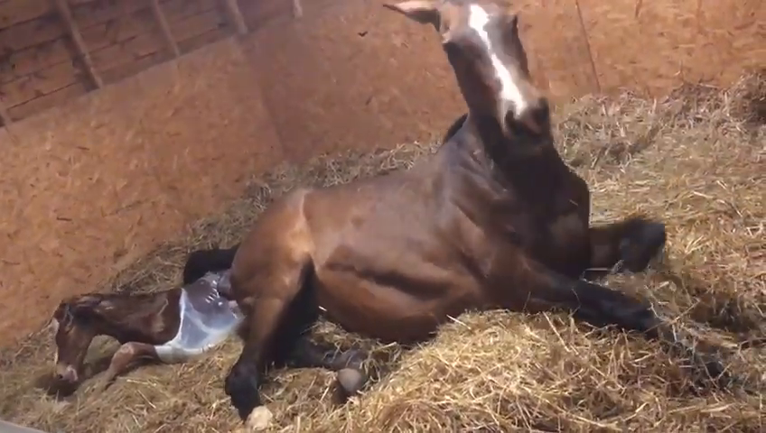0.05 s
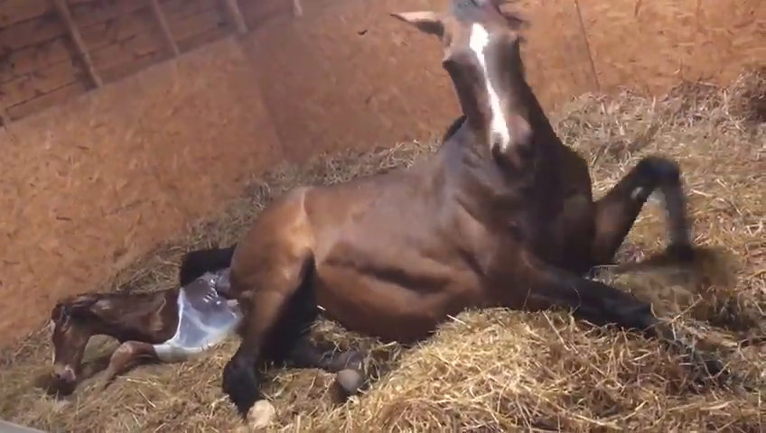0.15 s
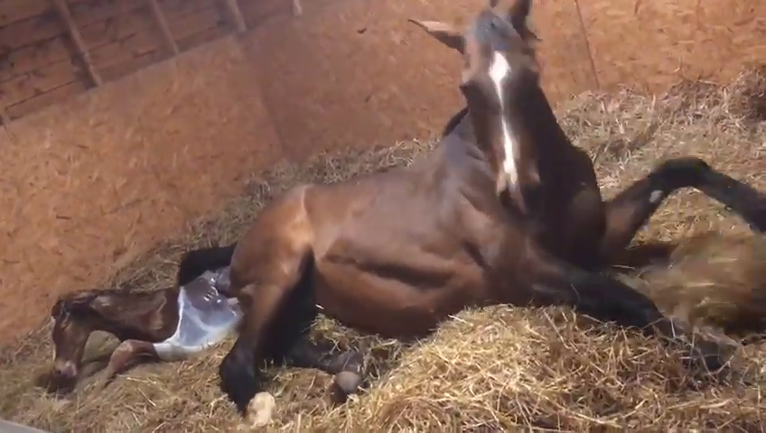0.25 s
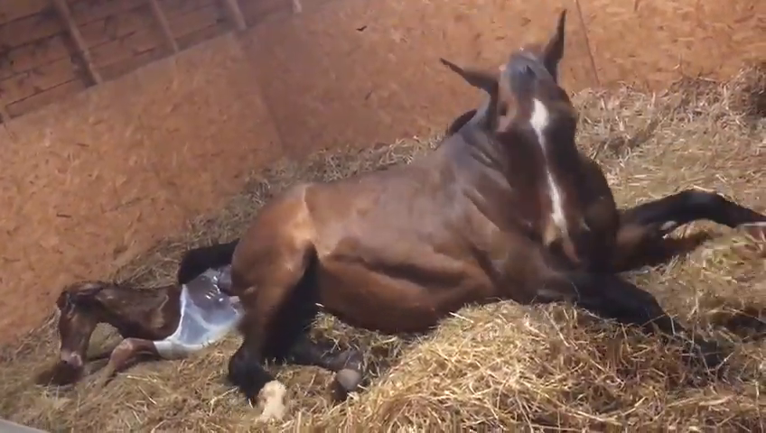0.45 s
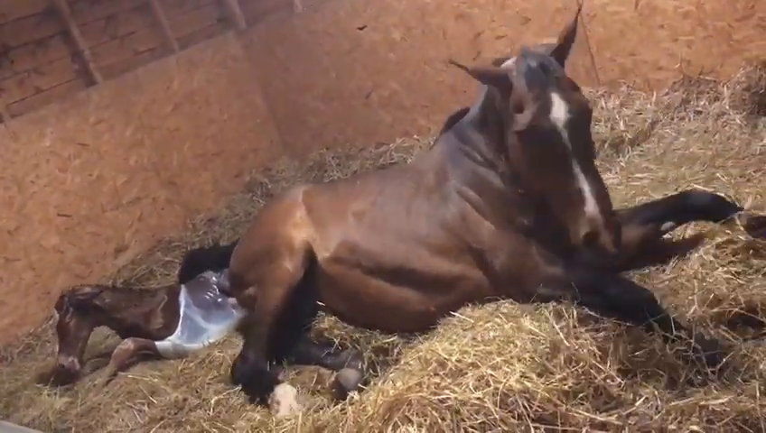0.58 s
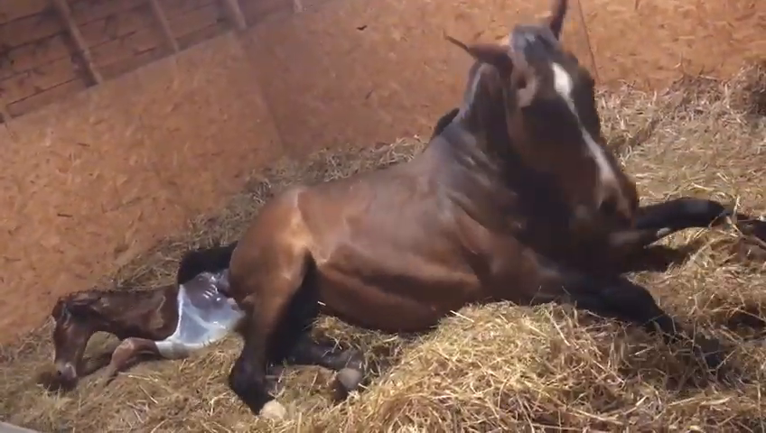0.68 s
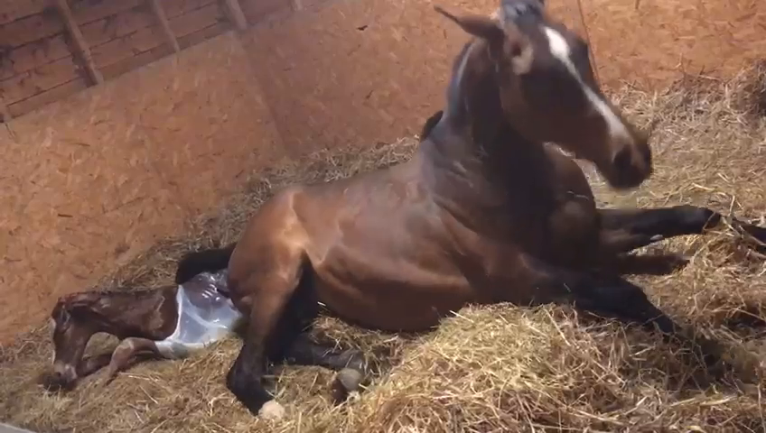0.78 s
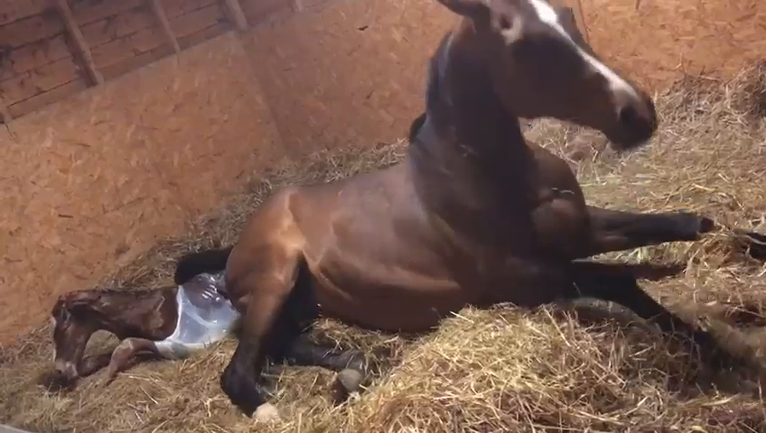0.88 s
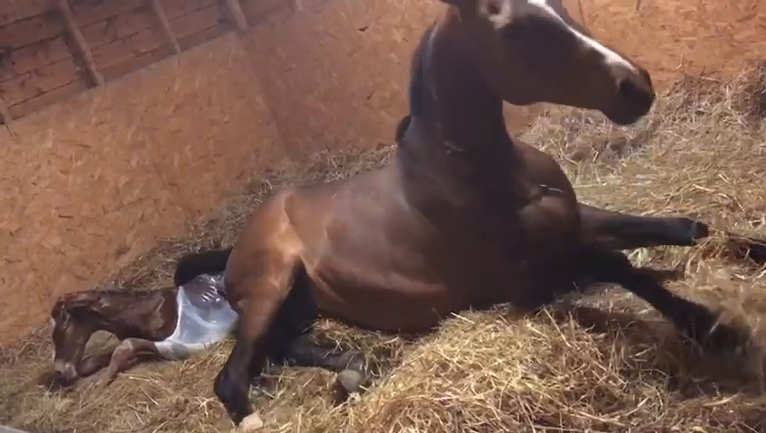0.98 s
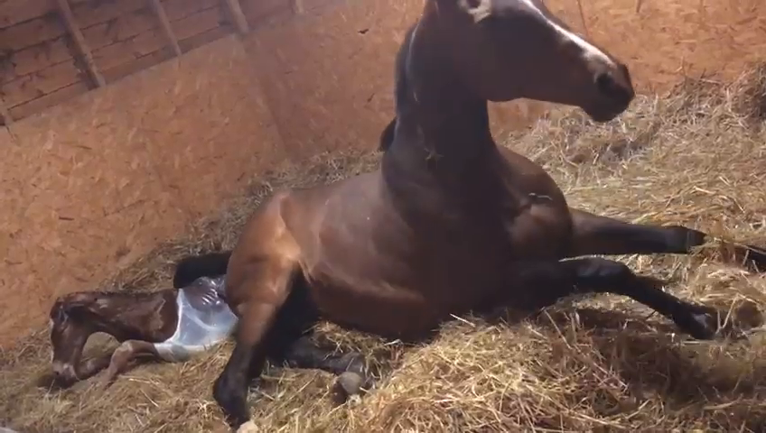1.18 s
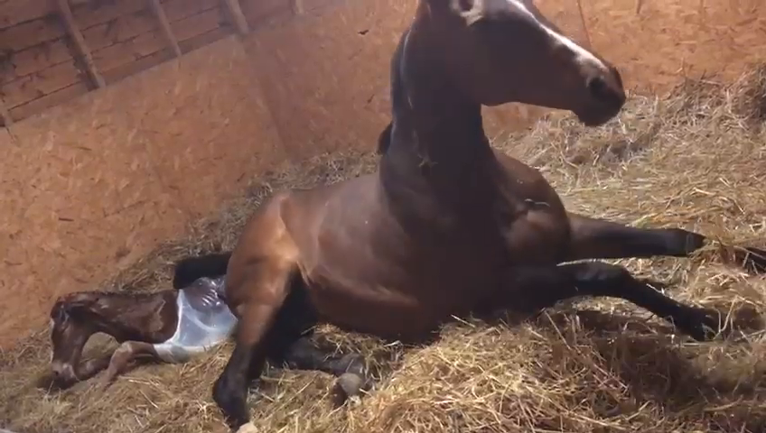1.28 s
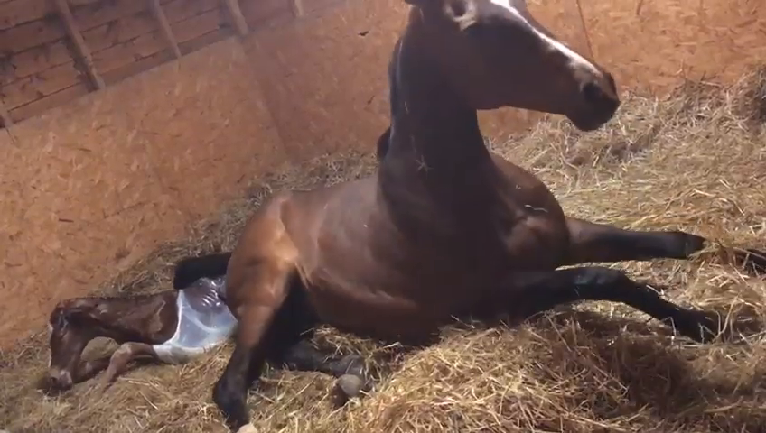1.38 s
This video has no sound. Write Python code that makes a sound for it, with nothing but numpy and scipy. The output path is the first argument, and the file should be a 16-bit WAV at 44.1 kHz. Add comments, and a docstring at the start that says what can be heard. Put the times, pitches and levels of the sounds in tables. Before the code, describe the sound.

Dry straw rustles in two swells under a horse shifting on the floor of a wooden stall. Between them a leg drops with a low thump and the hoof scuffs the boards, while the moving body rumbles faintly.

```python
"""Straw rustles, a dull thump booms, then the straw rustles again.
A horse lying in a wooden stall swings a foreleg through the straw, drops it, then slides its legs out.
Countless stalks scrape and snap under each move; the landing leg excites low modes of floor and stall,
and the hoof scuffs the boards. The shifting body rumbles; a faint low hum swells near the end."""
import sys
import numpy as np
from scipy import signal
from scipy.fft import rfft, irfft
from scipy.io import wavfile
from scipy.ndimage import uniform_filter1d

SR = 44100
rng = np.random.default_rng(int(sys.argv[2]) if len(sys.argv) > 2 else 0)


def file_out(sig):
    """Save sig as 16-bit WAV at sys.argv[1]."""
    # one column per channel
    cols = np.atleast_2d(sig).T
    # limit, then scale
    lim = np.clip(cols, -1, 1)
    pcm = np.round(lim * 32767).astype(np.int16)
    wavfile.write(sys.argv[1], SR, pcm)


N = 63945
T = np.arange(N) / SR
FREQ_HZ = np.fft.rfftfreq(N, 1 / SR)
STRAW_WET_DB = -9.5
# push of the legs through the straw: t/s, level/dB
LEG_PUSH = [(0, -82), (.025, -63.5), (.06, -55), (.15, -54), (.2, -50.5), (.26, -40.5), (.3, -40.5),
            (.36, -43.5), (.408, -40.5), (.45, -50), (.6, -50.5), (.68, -60.5), (.76, -63), (.83, -60),
            (.95, -48), (1.03, -45.5), (1.11, -41), (1.17, -45), (1.245, -56), (1.31, -65), (1.385, -74),
            (1.45, -75)]


def straw(crack_db=-5, scrape_db=-2.5, clump_db=-0.04, swept_until_s=0.42, pressed_from_s=0.47):
    """Stalks crack and scrape on each other, as loud as the legs push."""
    # rustle spectrum: f/Hz, level/dB
    spectrum = [(70, -40), (170, -6), (300, -12), (520, -10.5), (660, -8.5), (790, -12), (1250, -12.5),
                (1550, -7.5), (2100, -5.5), (2780, -9), (3200, -3.5), (4800, -5), (6300, -1.4), (7700, -4),
                (9100, -0.3), (10300, -4.5), (11800, -8)]
    # extra colour of a quick sweep: f/Hz, level/dB
    quick_tilt = [(300, 1.5), (1500, 1.5), (5000, 3.5), (8000, 2.5), (11500, 3.5)]
    rustle = bunches(amp(crack_db) * cracks() + amp(scrape_db) * noise())
    rustle *= amp(clump_db * drift(samples=300))
    slow = colour(rustle, spectrum)
    quick = colour(slow, quick_tilt)
    pressed = curve([(swept_until_s, 0), (pressed_from_s, 1)])
    rustle = (1 - pressed) * quick + pressed * slow
    return unit(rustle + amp(STRAW_WET_DB) * stall_reverb(rustle)) * amp(curve(LEG_PUSH))


def cracks(kinds=40, rate_per_s=3100, spread_db=3, decay_s=0.00055):
    """Stalks crack at random, each kind with its own brief splintering."""
    strength = amp(spread_db * np.minimum(rng.exponential(1, N), 4))
    impulses = strength * (rng.random(N) < rate_per_s / SR)
    kind = rng.integers(0, kinds, N)
    t = T[T < .006]
    splinters = rng.standard_normal((kinds, len(t))) * np.exp(-t / decay_s)
    return unit(sum(signal.oaconvolve(impulses * (kind == k), splinters[k])[:N] for k in range(kinds)))


def bunches(x, depth_db=1):
    """Each bunch of stalks favours its own pitch for a few milliseconds."""
    frames = signal.stft(x, nperseg=256)[2]
    patches = uniform_filter1d(rng.standard_normal(frames.shape), size=6, axis=0)
    patches = uniform_filter1d(patches, size=3, axis=1)
    return unit(signal.istft(frames * amp(depth_db * unit(patches)))[1][:N])


def snaps(tick_hz=6000, tick_s=0.000041, splinter_s=0.0068, splinter_db=-17, highpass_hz=1500):
    """Single stalks break: a sharp tick, then short splintering."""
    # stalk breaks: t/s, level/dB
    breaks = [(0.024, -49), (.0363, -47), (0.376, -32), (0.4056, -33), (0.412, -28), (0.7973, -39),
              (1.2932, -39)]
    out = np.zeros(N)
    for start_s, db in breaks:
        t = np.maximum(T - start_s, 0)
        tick = np.exp(-t / tick_s) * np.cos(2 * np.pi * tick_hz * t)
        splinter = amp(splinter_db) * np.exp(-t / splinter_s) * noise()
        out += (T >= start_s) * amp(db) * (tick + splinter)
    out = signal.sosfilt(signal.butter(2, highpass_hz, "high", fs=SR, output="sos"), out)
    return out + amp(STRAW_WET_DB) * stall_reverb(out)


def thumps(rise_cycles=1.1):
    """Cushioned blows swell into the low modes of floor and stall."""
    # legs landing and settling: t/s, level/dB, roll-off/(dB/octave)
    blows = [(0.142, -55, 5), (.389, -29, 1), (0.485, -42, 1.5), (.695, -49.5, 4.5), (.802, -49, 8.5),
             (1.074, -64.5, -2.5)]
    # floor and stall modes: f/Hz, gain/dB, t60/s, delay/s
    modes = [(44, -11, 0.32, 0.0064), (61.46, -1.5, 0.4, 0.0062), (75.34, -7, 0.7, 0.00796),
             (108.3, 4.5, 0.17, 0.028), (159.7, -16.5, 0.34, 0), (222.4, -10, 0.17, 0)]
    lowest_hz = modes[0][0]
    out = np.zeros(N)
    for start_s, blow_db, rolloff in blows:
        for hz, mode_db, t60_s, delay_s in modes:
            t = np.maximum(T - start_s - delay_s, 0)
            rise = np.sin(np.pi / 2 * np.minimum(t * hz / rise_cycles, 1)) ** 2
            gain = amp(blow_db + mode_db - rolloff * np.log2(hz / lowest_hz))
            out += gain * rise * amp(-60 * t / t60_s) * np.sin(2 * np.pi * hz * t)
    return out


def scuffs():
    """The hoof rubs the boards under the bedding into a short hollow ring."""
    # hoof rubs: t/s, level/dB, rise/s, fade/s
    rubs = [(0.083, -56.5, 0.099, 0.25), (0.38, -51, 0.0082, 0.15), (.462, -53.5, 0.0053, 0.17)]
    # board resonances: f/Hz, width/Hz, level/dB
    boards = [(256, 136, 3), (497, 114, -3.5), (625, 52, 1.5), (947, 154, -2.5)]
    envelope = np.zeros(N)
    for start_s, db, rise_s, fade_s in rubs:
        t = np.maximum(T - start_s, 0)
        envelope += np.minimum(t / rise_s, 1) * amp(db - 60 * (t / fade_s) ** 2)
    return envelope * unit(sum(amp(db) * ring(hz, width_hz) for hz, width_hz, db in boards))


def hollow(hz=643, width_hz=83, level_db=-71, follow=0.21):
    """The rustle wakes one hollow resonance."""
    push_db = curve(LEG_PUSH)
    return amp(level_db + follow * (push_db - push_db.max())) * ring(hz, width_hz)


def body_rumble():
    """The horse's shifting weight rumbles."""
    # rumble envelope: t/s, level/dB
    envelope = [(0, -73), (.05, -62), (.16, -57.5), (.21, -60), (.26, -60.5), (.36, -57), (.58, -59),
                (.73, -60.5), (.89, -76), (.97, -60), (1.04, -65), (1.11, -54.5), (1.22, -88), (1.45, -80)]
    # rumble spectrum: f/Hz, level/dB
    spectrum = [(20, -40), (42, -22), (62, -6), (110, -10.5), (160, -19), (260, -21), (400, -28),
                (1000, -28)]
    return amp(curve(envelope)) * colour(noise(), spectrum)


def hum(hz=190, level_db=-59.5, peak_s=1.357, spread_s=0.066, waver=0.058, fuzz_db=-8.5):
    """A faint, wavering, slightly rough tone swells and fades."""
    cycles = np.cumsum(hz * (1 + waver * drift(samples=300))) / SR
    tone = np.sin(2 * np.pi * cycles) + amp(fuzz_db) * ring(hz, width_hz=130)
    return amp(level_db) * np.exp(-((T - peak_s) / spread_s) ** 2) * tone


def stall_reverb(x, echoes_per_s=2000, gap_s=.003):
    """Sparse reflections form a short tail; the bass dies first."""
    # stall decay: f/Hz, t60/s
    decay = [(100, 0.29), (1000, 0.42), (10000, 0.42)]
    echoes = noise() * (rng.random(N) < echoes_per_s / SR) * (T > gap_s)
    hz, t, frames = signal.stft(echoes, SR, nperseg=256)
    tail = signal.istft(frames * amp(-60 * t / at_hz(decay, hz)[:, None]), SR)[1]
    return signal.fftconvolve(x, tail / np.linalg.norm(tail))[:N]


def air(level_db=-63.5):
    """Steady background noise of the stall."""
    # background spectrum: f/Hz, level/dB
    spectrum = [(20, -32), (37, 6.5), (55, 2), (100, -8), (160, -9), (280, -7.5), (450, -12), (640, -17.5),
                (900, -19), (2000, -23), (6000, -22), (12000, -24.5)]
    return amp(level_db) * colour(noise(), spectrum)


def amp(db):
    """Decibels to gain."""
    return 10 ** (np.asarray(db) / 20)


def unit(x):
    """Scale to rms 1."""
    return x / np.sqrt(np.mean(x ** 2) + 1e-20)


def curve(points):
    """Time table, interpolated per sample."""
    return np.interp(T, *np.transpose(points))


def at_hz(points, hz):
    """Frequency table, interpolated on a log axis."""
    table_hz, value = np.transpose(points)
    return np.interp(np.log(hz + 1), np.log(table_hz), value)


def colour(x, spectrum):
    """Filter by a spectrum table; rms 1."""
    return unit(irfft(rfft(x) * amp(at_hz(spectrum, FREQ_HZ)), N))


def noise():
    """White noise."""
    return rng.standard_normal(N)


def ring(hz, width_hz):
    """Noise in one steep resonance; rms 1."""
    return unit(irfft(rfft(noise()) / (1 + ((FREQ_HZ - hz) / (.5 * width_hz)) ** 2), N))


def drift(samples):
    """Smoothed random wander; rms 1."""
    return unit(uniform_filter1d(uniform_filter1d(noise(), samples), samples))


def scene():
    """All sources, alike in both channels."""
    mono = straw() + snaps() + thumps() + scuffs() + hollow() + body_rumble() + hum() + air()
    return np.array([mono, mono])


def record(dry):
    """Steep low-pass at 12 kHz."""
    lowpass = signal.firwin(511, 12000, window=("kaiser", 9), fs=SR)
    return signal.oaconvolve(dry, lowpass[None], "same")


dry = scene()
out = record(dry)
file_out(out)
```